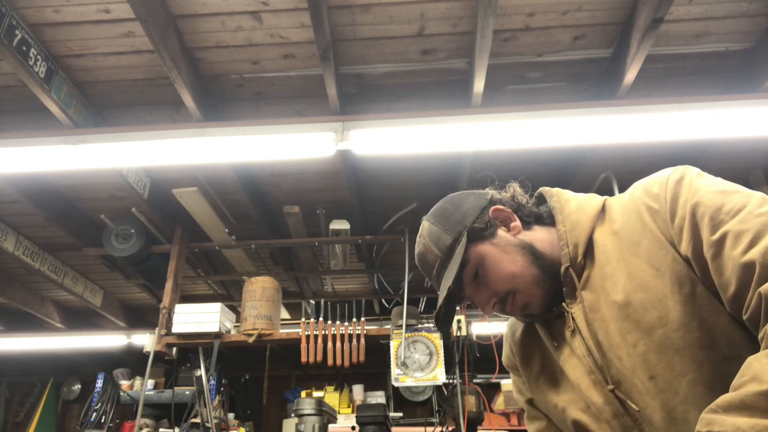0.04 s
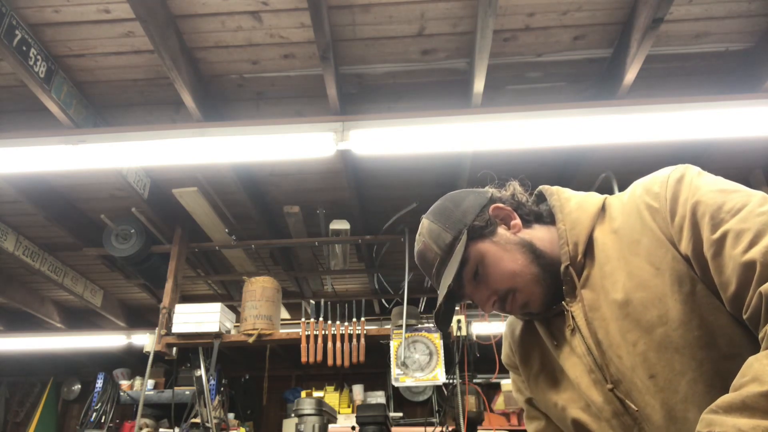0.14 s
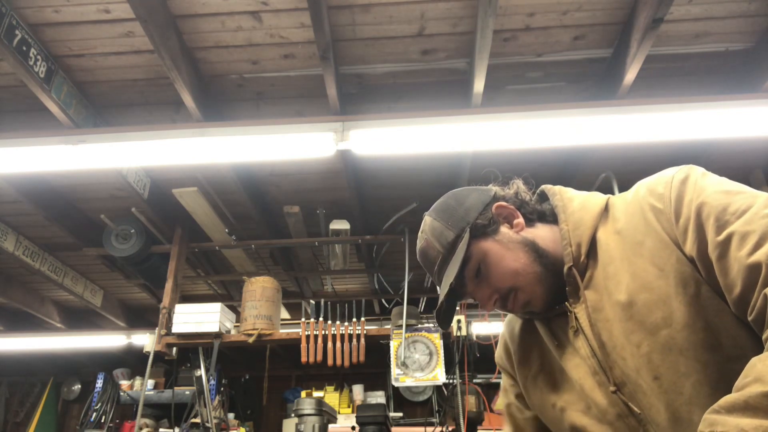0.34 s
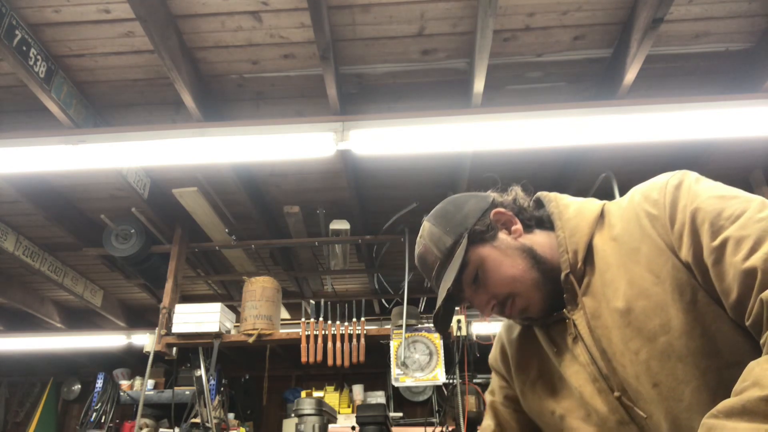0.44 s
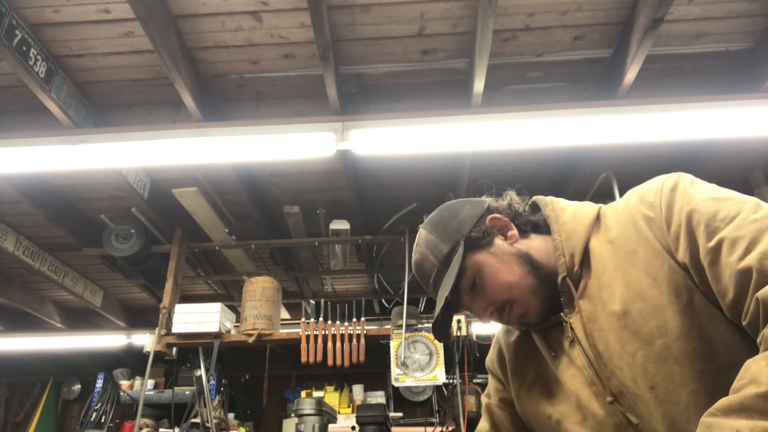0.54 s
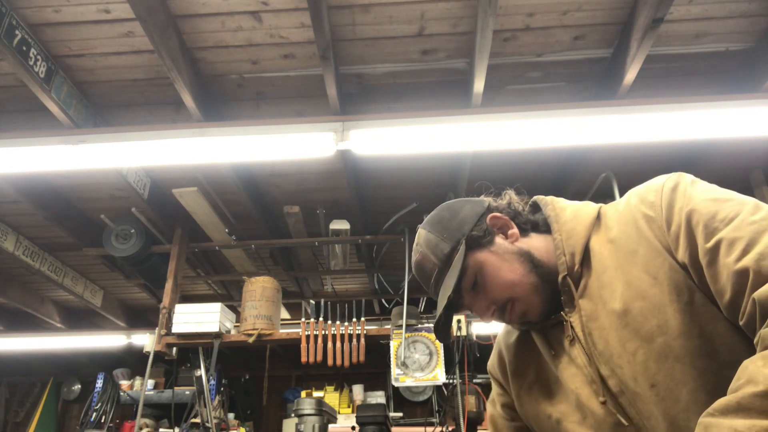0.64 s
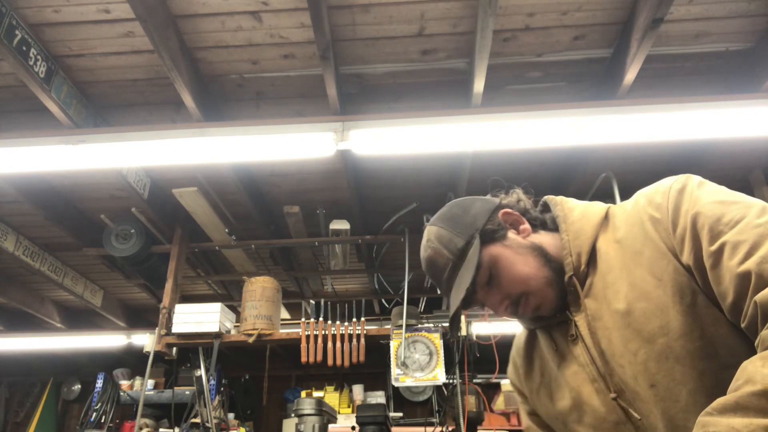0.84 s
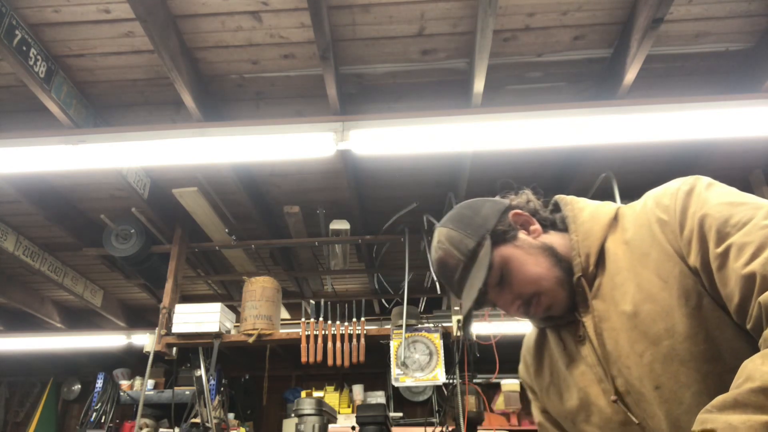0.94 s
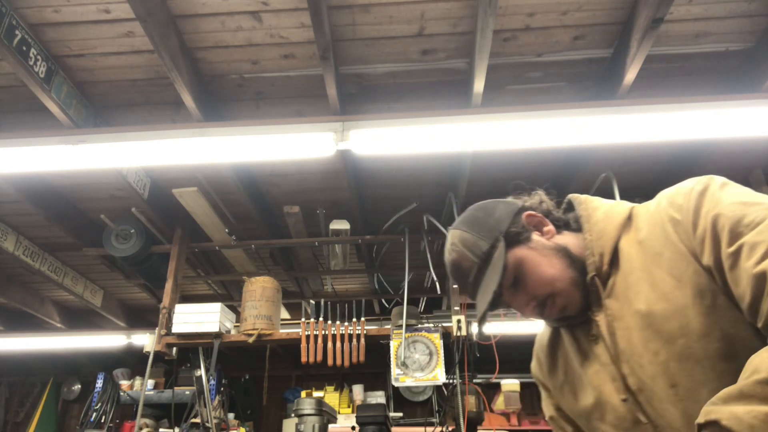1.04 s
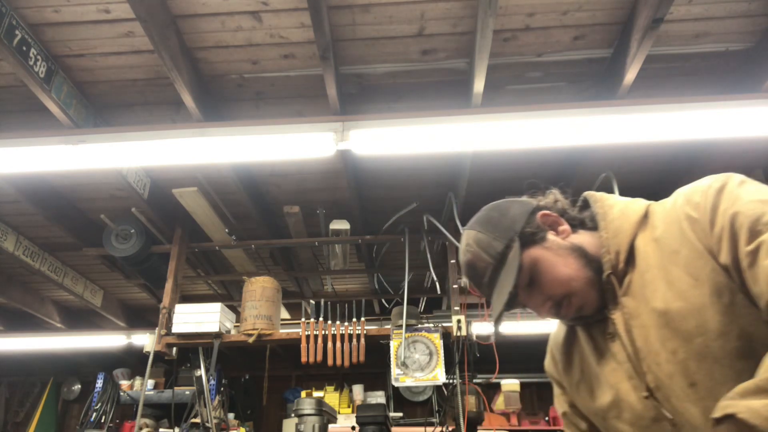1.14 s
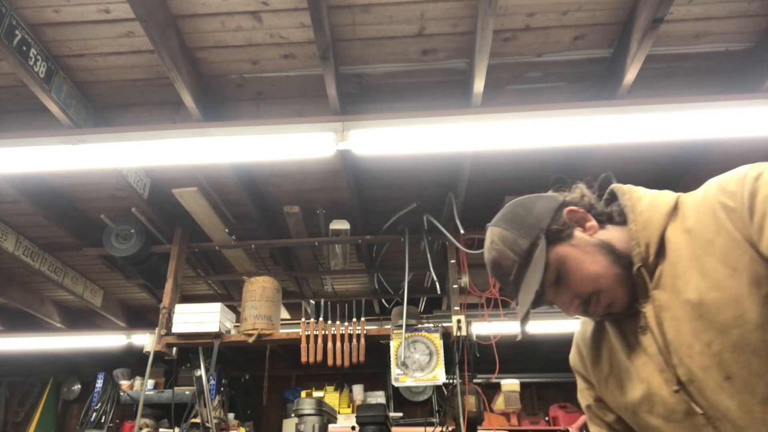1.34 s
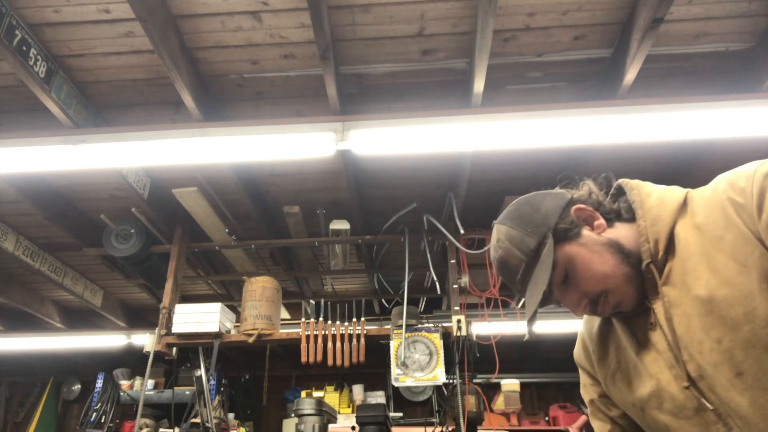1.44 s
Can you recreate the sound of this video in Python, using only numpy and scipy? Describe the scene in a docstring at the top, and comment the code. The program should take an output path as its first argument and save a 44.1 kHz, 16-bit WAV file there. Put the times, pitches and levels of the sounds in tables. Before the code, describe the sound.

In a quiet wooden workshop, a staple snaps loudly free and booms through a cardboard box. It clicks and creaks as hands bump the box, then a tool taps near the microphone and slides over the cardboard.

```python
"""A staple is levered out of a cardboard box and lets go with one loud snap that booms through the box.
Smaller clicks, a stick-slip creak and short gritty scrapes follow as it is worked free. Hands bump
the box, the tool taps and knocks, and one long, smooth scrape slides over the cardboard.
The box rumbles low as it is handled on the table, over the quiet hiss of a wooden workshop.
There is a single microphone, and the tool's taps are close to it."""
import sys
import numpy as np
from scipy import signal
from scipy.fft import rfft, irfft
from scipy.io import wavfile

SR = 44100
rng = np.random.default_rng(int(sys.argv[2]) if len(sys.argv) > 2 else 0)


def pcm_store(signal):
    """Save signal as 16-bit PCM."""
    levels = np.round(np.clip(np.atleast_2d(signal), -1, 1) * 32767)
    wavfile.write(sys.argv[1], SR, levels.astype(np.int16).T)


N = 66150
T = np.arange(N) / SR


def from_db(db):
    """Decibels to gain."""
    return 10 ** (np.asarray(db) / 20)


def at_hz(points, hz):
    """Read a table on a log-frequency axis."""
    freqs, values = np.transpose(points)
    return np.interp(np.log(np.maximum(hz, 1)), np.log(freqs), values)


def in_time(points):
    """Read a table of (time [s], level [dB]) as a gain curve."""
    return from_db(np.interp(T, *np.transpose(points)))


def coloured(noise, spectrum):
    """Give a steady noise a spectrum; rms 1."""
    gain = from_db(at_hz(spectrum, np.fft.rfftfreq(N, 1 / SR)))
    shaped = irfft(rfft(noise) * gain, N)
    return shaped / np.sqrt(np.mean(shaped ** 2) + 1e-20)


def bands(noise):
    """Split a noise into half-octave bands that add up to it: (centre [Hz], band)."""
    centres = 32 * 2 ** (np.arange(19) / 2)
    whole = rfft(noise)
    log_hz = np.log(np.fft.rfftfreq(N, 1 / SR) + 1)
    return [(hz, irfft(whole * np.interp(log_hz, np.log(centres), centres == hz), N)) for hz in centres]


def strike(start, rise_s, t60):
    """Envelope that rises at start and dies away."""
    age = np.maximum(T - start, 0)
    return (1 - np.exp(-age / rise_s)) * np.exp(-np.minimum(np.log(1000) * age / t60, 100))


def bursts(rows, spectrum):
    """Short bursts of coloured noise at rows of (time [s], level [dB], t60 [s])."""
    envelope = sum(from_db(db) * strike(s, rise_s=0.0005, t60=t60) for s, db, t60 in rows)
    return envelope * coloured(rng.standard_normal(N), spectrum)


def impulses(times, gains):
    """One-sample pulses at the given times."""
    return np.bincount(np.clip(np.asarray(times) * SR, 0, N - 1).astype(int), gains, N) + 1e-18


def soften(force, cutoff_hz):
    """A soft contact passes only the lows."""
    return signal.sosfilt(signal.butter(2, cutoff_hz, fs=SR, output="sos"), force)


def through(x, response):
    """Play a signal through a body or room."""
    return signal.fftconvolve(x, response)[:N]


# hiss of the workshop air: (frequency [Hz], relative density [dB])
AIR_SPECTRUM = [(150, -11), (450, 0), (1100, 0), (2000, -8), (3000, -8.5), (4500, -14), (6800, -15.5),
                (8000, -18), (10000, -21.5), (15000, -23)]
# its drift around level_db: (time [s], level [dB])
AIR_DRIFT = [(0, 6.5), (.1, -1.5), (.2, 2.5), (.6, -3.5), (.85, -4), (1.0, -2), (1.2, 7), (1.5, 1)]
def air(level_db=-62.5):
    """Quiet hiss of the workshop."""
    return from_db(level_db) * in_time(AIR_DRIFT) * coloured(rng.standard_normal(N), AIR_SPECTRUM)


# handling rumble: (frequency [Hz], relative density [dB])
RUMBLE_SPECTRUM = [(20, -29), (48, 4.5), (70, -1.5), (110, 1), (200, -2), (320, -9), (480, -29.5),
                   (1000, -28), (4000, -82)]
# its level at the microphone: (time [s], level [dB])
RUMBLE_LEVEL = [(0, -50), (.15, -49), (.58, -50), (.85, -56.5), (1.0, -56.5), (1.17, -54.5), (1.3, -52.5),
                (1.5, -50)]
def handling_rumble():
    """Low rumble of the box being handled on the table."""
    return in_time(RUMBLE_LEVEL) * coloured(rng.standard_normal(N), RUMBLE_SPECTRUM)


# modes of the cardboard box: (frequency [Hz], level [dB], free t60 [s])
BOX_MODES = [(105.3, 10, 0.14), (139.3, 5, 0.11), (193.4, -2, 0.19), (256.1, -2, 0.18), (303, -4, 0.1),
             (358.2, 2, 0.14), (476.7, -7, .16), (581, -11, .16), (693.5, -1, 0.15), (799, -9, 0.12),
             (1056.6, -7, 0.12), (1177, -13, 0.15), (1383, -7.5, 0.15), (2276, -21, .2)]
def box(force, held):
    """A force rings the box's modes; when a hand holds it, they build up and die sooner."""
    t60_share, swell_cycles = (0.44, 0.6) if held else (1, 2.05)
    ring = 0
    for k, (hz, db, t60) in enumerate(BOX_MODES):
        envelope = from_db(db) * strike(0, swell_cycles / hz, t60 * t60_share)
        ring += (-1) ** k * envelope * np.sin(2 * np.pi * hz * T)
    return through(force, ring)


# hands against the box: (time [s], level [dB], contact cut-off [Hz])
BUMPS = [(.001, -39.5, 179), (0.021, -36, 130), (.102, -43.5, 200), (0.175, -32, 230), (.195, -33.5, 220),
         (0.291, -22, 130), (.347, -24.5, 374), (.411, -22, 170), (.463, -40.5, 183), (0.527, -34, 238),
         (0.628, -33.5, 175), (.652, -35.5, 330), (.670, -36, 260), (.681, -28.5, 170), (.790, -47.5, 300),
         (.921, -46.5, 135), (.956, -52, 130), (1.087, -46.5, 393), (1.202, -36, 460), (1.266, -37.5, 180),
         (1.401, -39, 286), (1.408, -41.5, 244), (1.455, -34, 263)]
def bumps():
    """Soft bumps of the hands shake the held box."""
    force = sum(soften(impulses([s], [from_db(db)]), hz) for s, db, hz in BUMPS)
    return box(force, held=True)


# short strokes on the board: (middle time [s], half length [s], level [dB])
SCRAPES = [(.005, 0.03, -60.5), (0.317, 0.015, -49), (0.373, 0.017, -50), (0.64, 0.025, -56.5),
           (0.681, 0.014, -49.5)]
# their grit: (frequency [Hz], relative density [dB])
SCRAPE_SPECTRUM = [(200, -8), (600, 7), (1300, 7.5), (2500, -3), (3400, -4), (4200, 1), (5500, -7),
                   (7600, -8), (9000, -4), (10500, -15), (12500, -12), (15000, -18)]
def scrapes(grains_per_s=3000, spread_db=2):
    """Fibres tear in dense grains under short strokes."""
    tears = (rng.random(N) < grains_per_s / SR) * rng.choice([-1, 1], N)
    sizes = from_db(spread_db * np.minimum(rng.exponential(1, N), 4))
    strokes = sum(from_db(db) * np.exp(-0.5 * ((T - s) / half) ** 2) for s, half, db in SCRAPES)
    return strokes * coloured(tears * sizes, SCRAPE_SPECTRUM)


# the staple's legs spring free, then the board bounces back twice: (time [s], level [dB])
SNAP_HITS = [(0.2346, -27.5), (0.2355, -25.5), (0.2428, -28), (0.2552, -31), (0.2605, -34.5)]
# their hard edge: (frequency [Hz], relative density [dB])
RELEASE_SPECTRUM = [(500, -14), (1100, 7), (1600, 3.5), (2600, -3), (3900, 3), (4700, -13), (6000, -9.5),
                    (9000, -28), (15000, -46)]
def snap(t60=0.013):
    """The legs come free with a hard edge, and the board bounces back against them twice."""
    return bursts([(s, db, t60) for s, db in SNAP_HITS], RELEASE_SPECTRUM)


SNAP_S, SNAP_BOOM_DB, SNAP_CRACK_DB = 0.2352, -15.5, -17
def boom():
    """The released board springs back and the whole box rings."""
    return box(impulses([SNAP_S], [from_db(SNAP_BOOM_DB)]), held=False)


# crack of the board: (frequency [Hz], relative density [dB])
CRACK_SPECTRUM = [(25, -42), (42, -3), (62, -20), (85, -1), (150, 0), (330, -1.5), (520, -12), (800, -8),
                  (1200, -4), (1800, -13), (2400, -11.5), (3700, -26.5), (5000, -33.5), (7000, -41.5),
                  (10000, -49.5), (15000, -58)]
# its decay: (frequency [Hz], t60 [s])
CRACK_T60 = [(50, 0.23), (300, 0.21), (1200, 0.17), (3000, .15), (6000, 0.26), (14000, 0.2)]
# the staple catches and slips: (time [s], steel tick level [dB], board crack level [dB])
CLICKS = [(0.3494, -45.5, -40.5), (0.4116, -43, -33), (0.522, -60, -60), (0.5293, -52, -42.5),
          (0.6309, -53.5, -62)]
def cracks(rise_cycles=0.8):
    """The board's dense, short-lived modes sound at the snap and each click; lows build up later."""
    hits = [(SNAP_S, SNAP_CRACK_DB)] + [(s, db) for s, _, db in CLICKS]
    sound = 0
    for hz, band in bands(coloured(rng.standard_normal(N), CRACK_SPECTRUM)):
        t60 = at_hz(CRACK_T60, hz)
        power = sum((from_db(db) * strike(s, rise_cycles / hz, t60)) ** 2 for s, db in hits)
        sound += band * np.sqrt(power)
    return sound


# steel tick: (frequency [Hz], relative density [dB])
TICK_SPECTRUM = [(800, -6), (2000, -5), (4000, -0.5), (5000, -4.5), (6300, 0.5), (8500, -14), (10500, -17),
                 (15000, -23)]
def ticks(t60=0.058):
    """Steel ticks brightly on steel each time the staple catches and slips."""
    return bursts([(s, db, t60) for s, db, _ in CLICKS], TICK_SPECTRUM)


# the staple drags through the board: (start time [s], end time [s], level [dB])
CREAKS = [(.369, .405, -30)]
def creak(slips_per_s=282, jitter=0.06):
    """A run of stick-slip jerks shakes the held box."""
    force = 0
    for start, end, db in CREAKS:
        times = start + np.cumsum(1 + jitter * rng.standard_normal(40)) / slips_per_s
        force += impulses(times, from_db(db) * (times < end))
    return box(soften(force, cutoff_hz=450), held=True)


# the tool, close to the microphone: (time [s], level [dB], t60 [s])
TAPS = [(1.006, -45, 0.017), (1.0162, -53, .006), (1.0443, -52, 0.0084), (1.088, -65, 0.023)]
# colour of a tap: (frequency [Hz], relative density [dB])
TAP_SPECTRUM = [(300, 10), (900, 10), (2200, -2), (4500, -7), (7500, -4.5), (11000, -9), (15000, -15)]
def taps():
    """Light, dry taps of the tool die away almost at once."""
    return bursts(TAPS, TAP_SPECTRUM)


# the long stroke at the microphone: (time [s], level [dB])
SLIDE_LEVEL = [(1.04, -84), (1.095, -60.5), (1.155, -47.5), (1.21, -43.5), (1.285, -44), (1.33, -48.5),
               (1.372, -63), (1.44, -87)]
# its friction: (frequency [Hz], relative density [dB])
SLIDE_SPECTRUM = [(100, 8), (330, 5), (480, -4), (800, 0), (1200, 4), (1800, -2), (2300, 1), (3100, -2),
                  (4000, 1), (4900, -5), (5700, 1.5), (6900, 1.5), (7700, -2.5), (9600, -1), (10300, -7.5),
                  (12200, -3), (15500, -7.5)]
def slide():
    """Fine friction over the cardboard swells and fades with the stroke."""
    return in_time(SLIDE_LEVEL) * coloured(rng.standard_normal(N), SLIDE_SPECTRUM)


# the tool knocks on the board: (time [s], level [dB])
KNOCKS = [(1.2045, -50.5), (1.448, -48), (1.457, -50.5)]
# modes of the struck panel: (frequency [Hz], level [dB], t60 [s])
PANEL_MODES = [(537, 3, 0.085), (772, -3.5, 0.033), (980, -2, .035), (1210, -3.5, 0.024),
               (1407, 0.5, 0.025), (1660, -12, 0.026)]
def knocks():
    """Light knocks ring one panel of the box hollowly."""
    ring = 0
    for k, (hz, db, t60) in enumerate(PANEL_MODES):
        envelope = from_db(db - 60 * np.minimum(T / t60, 10))
        ring += (-1) ** k * envelope * np.sin(2 * np.pi * hz * T)
    times, levels = np.transpose(KNOCKS)
    return through(impulses(times, from_db(levels)), ring)


# decay of the wooden workshop: (frequency [Hz], t60 [s])
ROOM_T60 = [(100, 0.4), (400, 0.64), (1500, 0.49), (5000, 0.77), (14000, 0.15)]
# its reverberation at the microphone: (frequency [Hz], level against the direct sound [dB])
ROOM_LEVEL = [(60, -6.5), (300, -11.5), (1200, -7.5), (5000, -6.5), (14000, -7.5)]
def workshop(sound, delay_s=0.0079):
    """Diffuse reverberation reaches the microphone after the direct sound; the very top dies first."""
    tail = 0
    for hz, band in bands(rng.standard_normal(N)):
        fade = strike(delay_s, rise_s=0.0034, t60=at_hz(ROOM_T60, hz))
        tail += band * from_db(at_hz(ROOM_LEVEL, hz)) * fade / np.sqrt(np.sum(fade ** 2))
    return through(sound, tail)


def scene():
    """The work on the box, heard in mono from one spot in the workshop."""
    work = snap() + cracks() + ticks() + knocks() + bumps() + creak() + scrapes()
    # the box's boom and the close taps are fairly dry, with little room reverberation
    dry_boom, close_taps = boom(), taps()
    room = workshop(work + from_db(-5) * dry_boom + from_db(-7) * close_taps)
    return (work + dry_boom + close_taps + room + slide() + air() + handling_rumble())[None]


def record(dry, cutoff_hz=15600):
    """The top is cut steeply."""
    return signal.sosfilt(signal.ellip(12, 0.1, 80, cutoff_hz, fs=SR, output="sos"), dry)


dry = scene()
out = record(dry)
pcm_store(out)
```